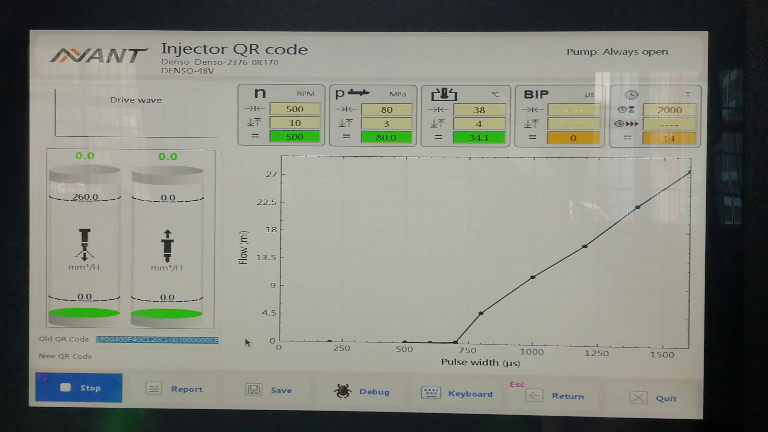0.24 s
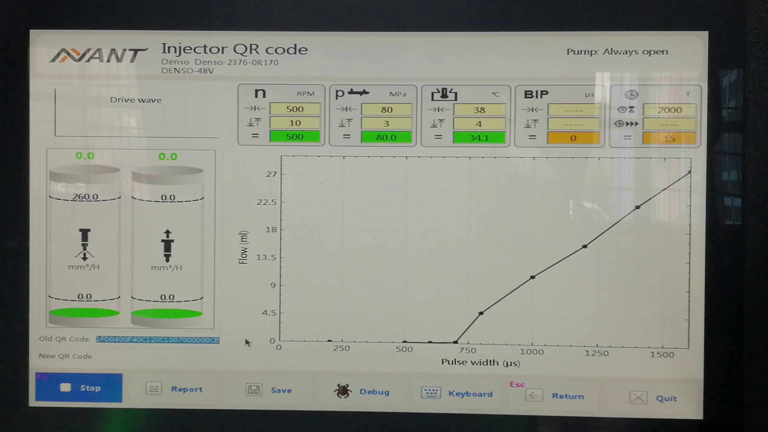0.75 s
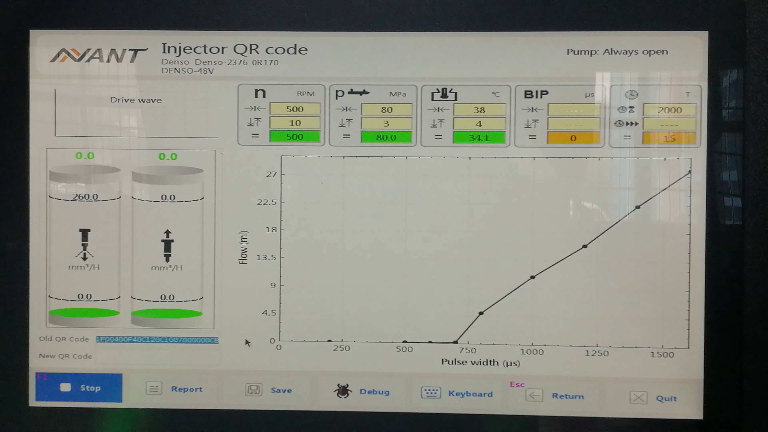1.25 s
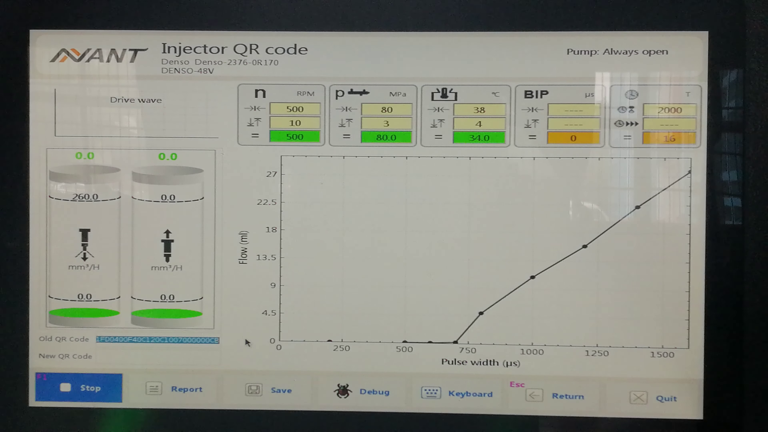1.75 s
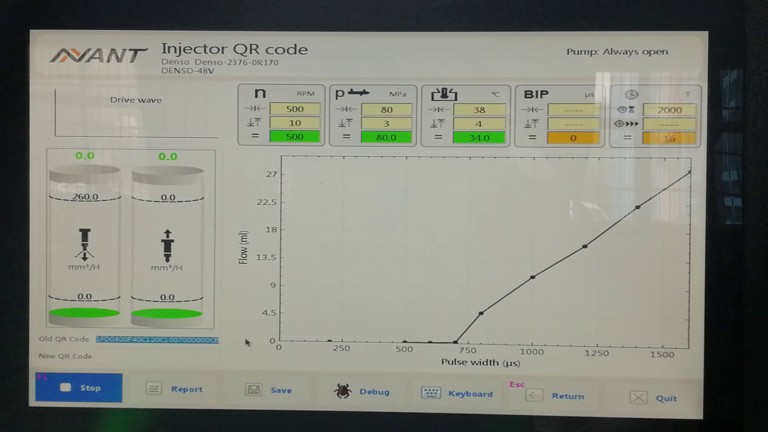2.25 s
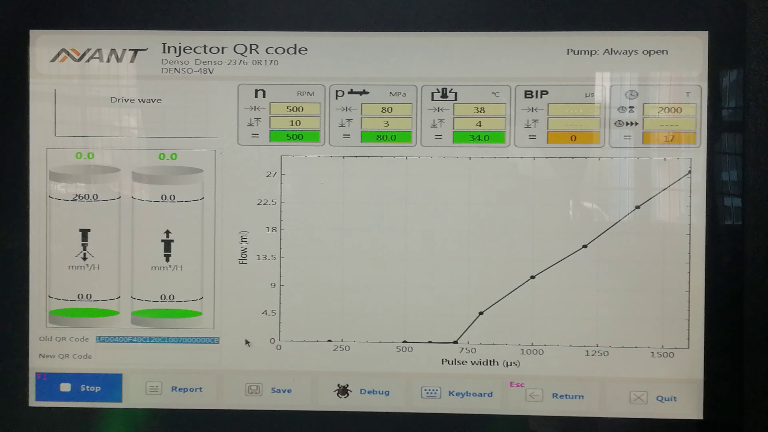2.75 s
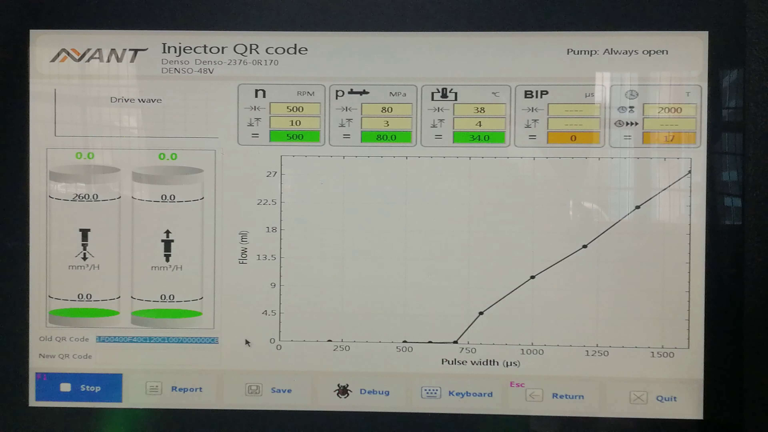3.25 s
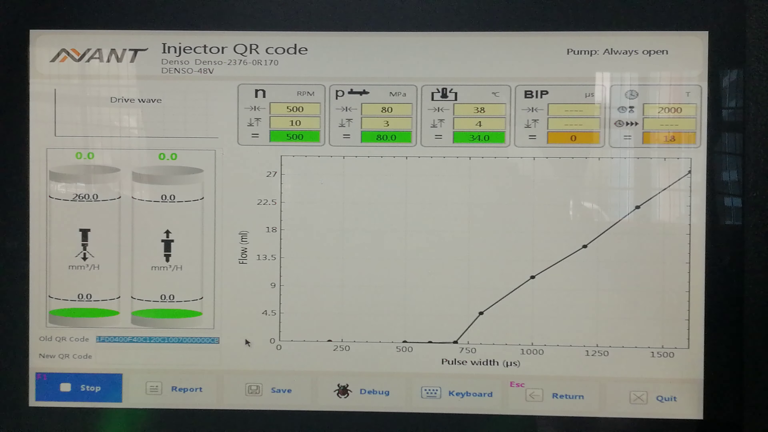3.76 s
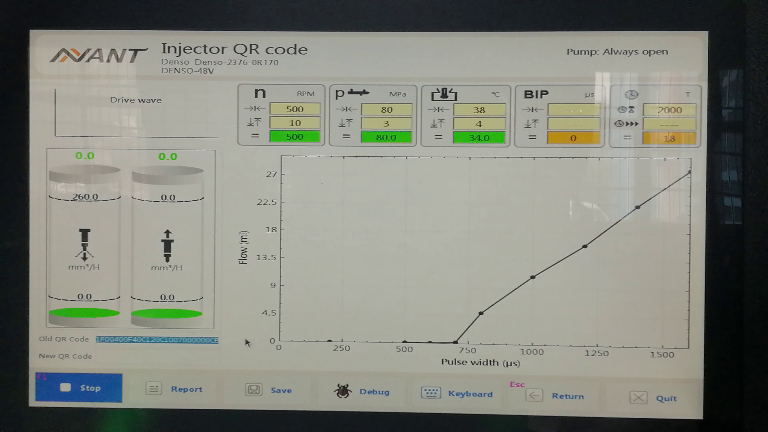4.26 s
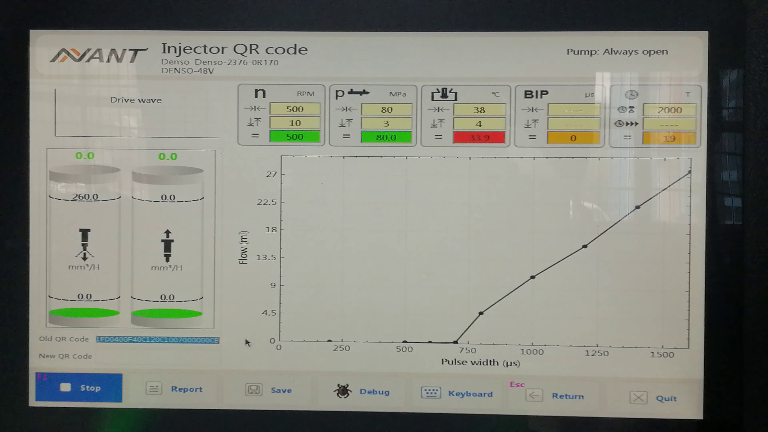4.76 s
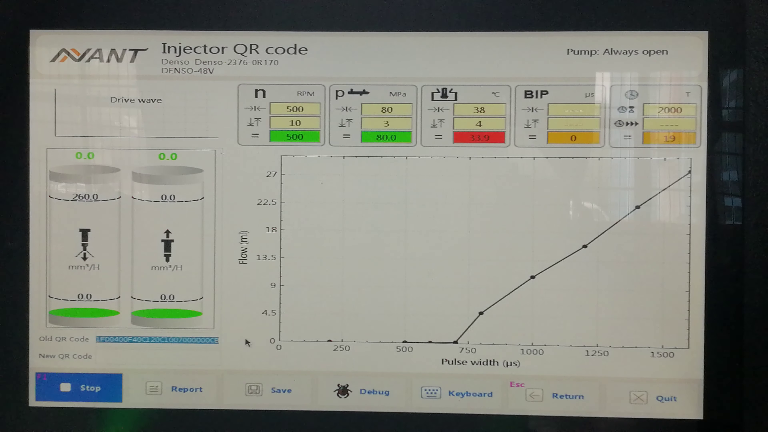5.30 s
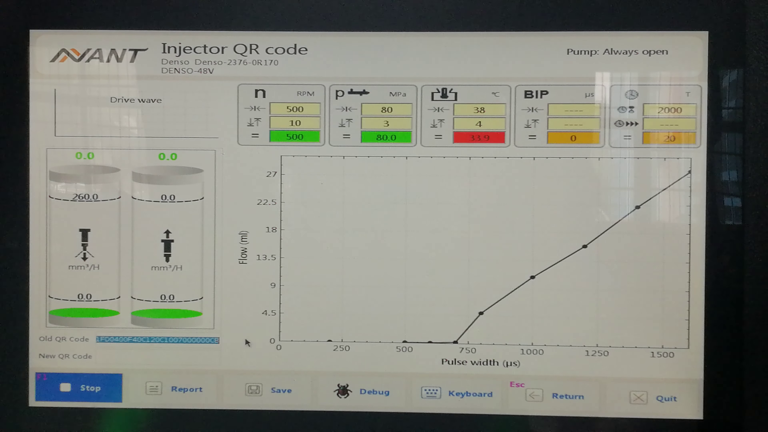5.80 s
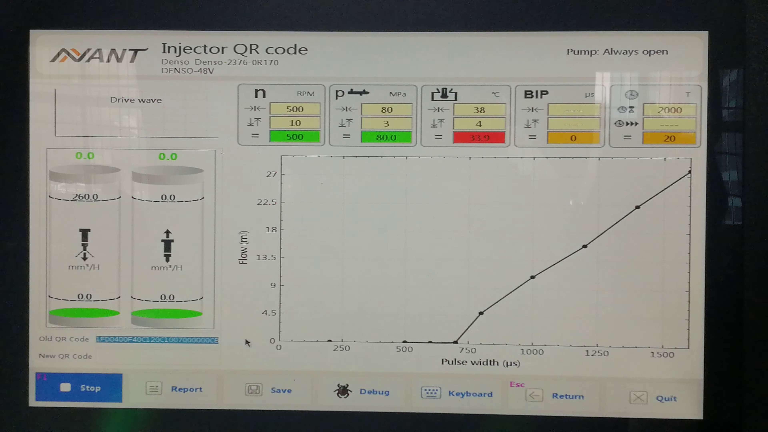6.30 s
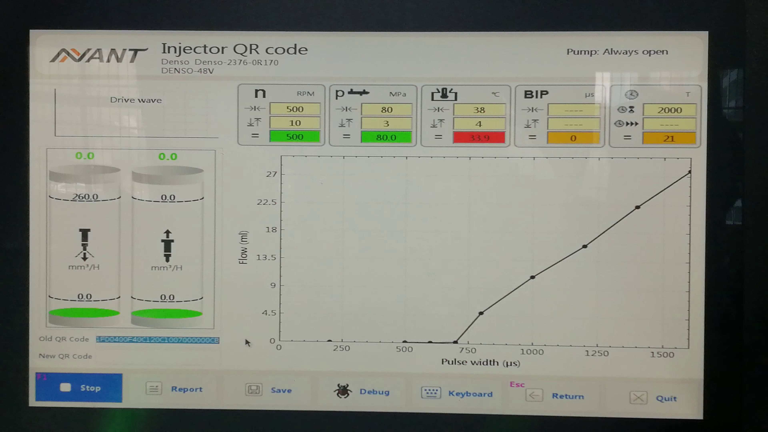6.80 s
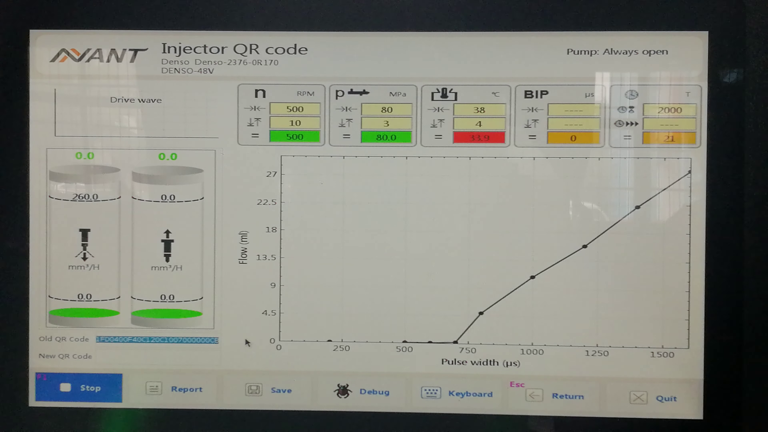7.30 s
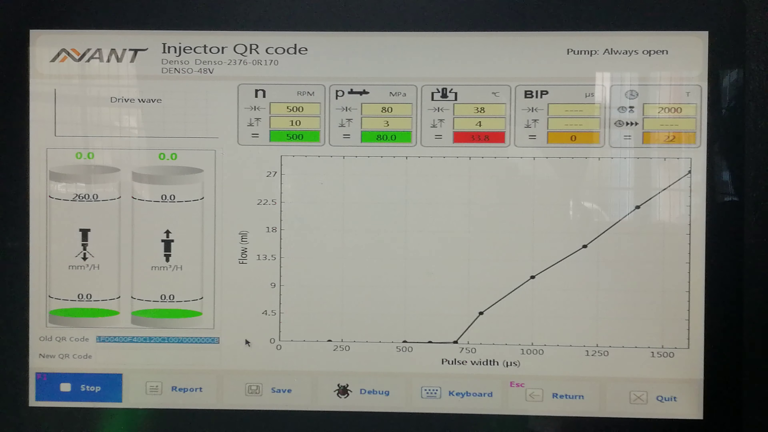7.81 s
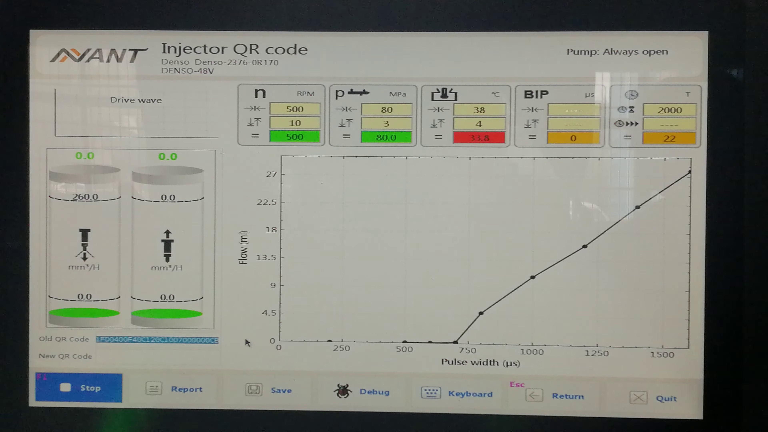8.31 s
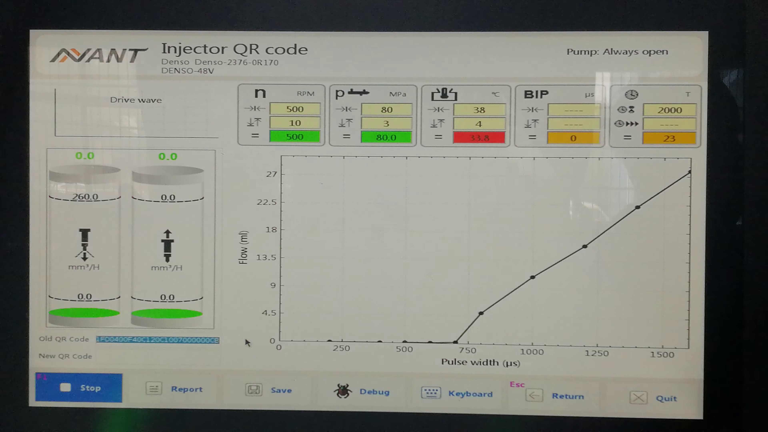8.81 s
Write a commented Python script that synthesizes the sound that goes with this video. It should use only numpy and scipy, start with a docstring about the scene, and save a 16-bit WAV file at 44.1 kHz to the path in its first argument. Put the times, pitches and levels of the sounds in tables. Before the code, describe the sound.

Continuous machine noise, already running and never stopping: rapid hard clicking from an injector, each click a tiny cluster of bright snaps with a brief metallic ring. Beneath lie the wavering hum and rattle of a drive motor and feed pump, steady treble hiss with narrow whistles, and low rumbling air. A short spurt of hiss comes about a third through, deep panel booms rise and fall, and the last ticks ring less. Close stereo pickup.

```python
"""Sharp ticks, 17 a second, over the hum of two shafts and a bright hiss: a diesel injector test bench. Each
tick is four noise bursts and ringing modes; near the end the pulses are short and the ticks lighter. Fuel
hisses and whistles through the pressure valve (shaped noise), under a thin high whine. The drive and feed
shafts hum (wavering sines) and rattle (noise repeated each turn). Behind them a low boom swells and sinks, a
fan motor hums and air rumbles."""
import sys
import numpy as np
from scipy import signal
from scipy.fft import rfft, irfft
from scipy.io import wavfile
from scipy.ndimage import uniform_filter1d

SR = 44100
rng = np.random.default_rng(int(sys.argv[2]) if len(sys.argv) > 2 else 0)


def wav_record(signal):
    """Record a signal, one row per channel, as 16-bit PCM in the file named by sys.argv[1]."""
    frames = np.transpose(np.atleast_2d(signal))
    bounded = np.clip(frames, -1, 1)
    # unit amplitude maps onto the largest positive 16-bit level
    quanta = np.round(bounded * 32767).astype(np.int16)
    wavfile.write(sys.argv[1], SR, quanta)


N = 399105
T = np.arange(N) / SR

DRIVE_HZ, FEED_HZ, SHOT_HZ = 13.137, 24.655, 17.0023
FIRST_SHOT_S, SHORT_PULSE_S = .0128, 8.69  # shots after SHORT_PULSE_S are short pulses
PORT_LAG_S = .00065  # left behind right, above the deep bass
TOP_HZ = 15700


def injector(crack_db=-8, snap_db=-6, ring_db=-36.0, scatter_db=1.04, jitter_s=.000012,
             short_crack_db=-1.5, short_ring_db=-15):
    """Each shot is four blows; on a short pulse the needle hardly lifts and the body rings less."""
    # armature lifts, needle stops, valve closes, needle seats:
    # (delay [s], relative crack level [dB], relative snap level [dB])
    blows = [(0, -1.5, -3.5), (.0013, -3, 0.5), (.0034, -3, -13), (.0046, -2, -18)]
    # crack of steel on steel: (frequency [Hz], relative level [dB], left minus right [dB])
    crack_colour = [(1500, -30, 13.5), (3060, -20.5, -6), (4320, -7, -9.5), (5470, -6, -1.5),
                    (6370, -2, -20.5), (7550, -1.5, -5), (8650, 0.5, 0.5), (9330, -6.5, -16),
                    (10560, -9.5, -10.5), (12000, -18, -16), (15600, -30.5, -35)]
    # bright snap of the solenoid: (frequency [Hz], relative level [dB], left minus right [dB])
    snap_colour = [(2030, -34, -2), (3860, -11.5, -7.5), (5030, -6.5, -8), (6440, -4, -14), (7500, -12, 4),
                   (8800, -5, -14), (11300, -18.5, -4), (14000, -21, -20), (14900, -17, -24),
                   (15800, -33, -32)]
    shots_s = np.arange(FIRST_SHOT_S, T[-1] - .01, 1 / SHOT_HZ)
    short = shots_s > SHORT_PULSE_S
    crack = impact(crack_colour, t60_s=.006, tail_db=-16, tail_t60_s=.06)
    snap = impact(snap_colour, t60_s=.003, tail_db=-24, tail_t60_s=.03)
    out = 0
    for blow, (delay_s, blow_crack_db, blow_snap_db) in enumerate(blows):
        late, strength = rng.standard_normal((len(shots_s), 2)).T
        times_s = shots_s + delay_s + jitter_s * late
        scattered_db = scatter_db * strength
        click = crack * undb(crack_db + blow_crack_db) + snap * undb(snap_db + blow_snap_db)
        out = out + strike(times_s, scattered_db + short * short_crack_db, click)
        out = out + strike(times_s, ring_db + scattered_db + short * short_ring_db, ring(blow))
    return out


def impact(table, t60_s, tail_db, tail_t60_s):
    """What one blow sends to each port: a short coloured burst and its echoes inside the cabinet."""
    t = np.arange(SR // 10) / SR
    hz = np.fft.rfftfreq(len(t), 1 / SR)
    early, late = rng.standard_normal((2, 2, len(t)))
    direct = early * np.exp(-np.log(1000) * t / t60_s)
    echoes = late * undb(tail_db) * np.exp(-np.log(1000) * t / tail_t60_s)
    burst = rfft(direct + echoes)
    # broad dips of the random burst are levelled, its fine ripple stays
    ripple = np.sqrt(uniform_filter1d(np.abs(burst) ** 2, size=70))
    target = undb(colour(table, hz)) * pan(colour(table, hz, axis=2))
    # folded cepstrum: a causal filter sets the colour and keeps the attack sharp
    cepstrum = irfft(np.log(target / ripple), len(t))
    cepstrum[:, 1:] *= 2 * (t[1:] < t[-1] / 2)
    return irfft(burst * np.exp(rfft(cepstrum)), len(t))


def ring(blow):
    """Decaying sines of the modes set off by one blow, a quarter cycle apart at the two ports."""
    # injector modes, the solenoid's struck on opening and the nozzle's on closing:
    # (blow number, frequency [Hz], relative level [dB], 60 dB decay [s], left minus right [dB])
    modes = [(0, 4410, -17, 0.016, -17), (0, 5193, -5, 0.053, -11.5), (0, 6440, -7, 0.016, 14),
             (1, 8390, -4, 0.011, 2), (2, 7085, 3, 0.022, -2), (2, 8310, -1.5, 0.029, -2),
             (3, 7107, 1, 0.046, 10.5), (3, 8650, -5.5, 0.015, -2)]
    t = np.arange(SR // 10) / SR
    port_phase = np.array([[0], [np.pi / 2]])
    out = 0
    for struck_by, hz, db, t60_s, side_db in modes:
        if round(struck_by) == blow:
            decay = np.exp(-np.log(1000) * t / t60_s)
            out = out + undb(db) * pan(side_db) * decay * np.sin(2 * np.pi * hz * t + port_phase)
    return out


def strike(times_s, db, response):
    """One response, repeated at the given times and levels."""
    at = times_s[:, None] * SR
    # sinc pulses place each blow between samples
    taps = at.astype(int) + np.arange(-8, 9)
    force = np.zeros((1, N + SR))
    force[0, taps] = np.sinc(taps - at) * undb(db)[:, None]
    return signal.fftconvolve(force, response, axes=1)[:, :N]


def valve(flicker_db=0.94):
    """Fuel hisses through the pressure valve, with brief spurts; narrow resonances whistle in the flow."""
    # steady hiss: (frequency [Hz], density [dB per Hz], left minus right [dB])
    hiss_colour = [(1000, -105, 1), (2760, -87.5, 0), (4640, -89, 0), (5800, -85, -1), (7640, -82, -2.5),
                   (9200, -79.5, -1.5), (10300, -84, -6.5), (11160, -87.5, -12), (12300, -94, -9),
                   (13240, -84, -11), (14100, -103, -15), (14900, -99, -20), (15800, -110, -22)]
    # whistles: (frequency [Hz], bandwidth [Hz], level [dB], left minus right [dB])
    whistles = [(1988, 56, -61.5, -2), (2840, 200, -56, -2), (6604, 51, -56, 2), (6710, 37, -56.5, 1),
                (10250, 80, -63, -14), (12800, 20, -70, -14), (13000, 20, -71, -8), (13354, 28, -69, -5),
                (13700, 20, -67, 0), (13801, 12, -74, -16)]
    # spurts of hiss: (time [s], half-width at half amplitude [s], relative level [dB])
    spurt_times = [(3.075, 0.049, 0.5), (7.6, .035, -8)]
    # spurt colour: (frequency [Hz], density of a 0 dB spurt [dB per Hz], left minus right [dB])
    spurt_colour = [(1200, -100, 0), (2700, -81.5, 7), (4930, -82.5, -3), (7000, -76.5, 0),
                    (9000, -74.5, -3), (10500, -87, -6), (12000, -97, -10), (15000, -108, -18)]
    hiss = rush(hiss_colour) * undb(flicker_db * walk(41))

    hz, noise = port_noise(N)
    gain = 0
    for centre_hz, width_hz, db, side_db in whistles:
        offset = (hz - centre_hz) / width_hz
        resonance = np.sqrt(SR / np.pi / width_hz) / (1 + 2j * offset)
        far_fade = np.exp(-(offset / 10) ** 2)
        gain = gain + undb(db) * pan(side_db) * resonance * far_fade
    whistling = irfft(noise * gain, N)

    spurts = sum(undb(db) / (1 + ((T - s) / width_s) ** 2) for s, width_s, db in spurt_times)
    return hiss + whistling + rush(spurt_colour) * spurts


def whine(db=-57, side_db=-16, wander=.0005):
    """A thin, even whine in the high treble: one sine of slightly wandering pitch."""
    hz = 13354
    cycles = np.cumsum(hz * (1 + wander * walk(25))) / SR
    return tone(hz, cycles, db) * pan(side_db)


def drive_shaft():
    """Hum and rattle of the drive motor and high-pressure pump."""
    # (multiple of the shaft rate, rounded in use, mean level [dB], left minus right [dB])
    orders = [(6, -58, 0), (8, -59.5, 0), (10, -54, -1.5), (12, -61.5, 8), (14, -56, 2), (16, -55, -13),
              (17, -44, 2), (18, -61.5, 3), (21, -44.4, 0), (22, -71, 4), (26, -65, 14), (30, -61, 1),
              (35, -62.5, 7.5), (36, -62, -8), (73.81, -57.5, -10.5)]
    return shaft(DRIVE_HZ, orders, wander=0.0005, flutter_1khz_db=0.7, clatter_db=-3)


def feed_shaft():
    """Hum and rattle of the feed pump, strongest at the rate of its 13 vanes."""
    # (multiple of the shaft rate, rounded in use, mean level [dB], left minus right [dB])
    orders = [(4, -64, -2), (12, -58.5, -5), (13, -42.5, -2), (25, -66.5, -10.5), (26, -56.5, -7.5),
              (27, -67, -16), (38, -62, -2.5), (39, -61.5, -11.5), (40, -62, -8), (50, -69, 12),
              (51, -66.5, -15.5), (52, -61, 10.5), (53, -60, -3.5), (55, -64.5, 5), (56, -72, -18),
              (65.5, -71.5, 11), (78.3, -64.5, -8)]
    return shaft(FEED_HZ, orders, wander=0.00088, flutter_1khz_db=2.0, clatter_db=-3.5)


def shaft(hz, orders, wander, flutter_1khz_db, clatter_db):
    """A loaded shaft: tones at multiples of its rate, and a rattle that comes round with every turn."""
    # rattle, before clatter_db: (frequency [Hz], relative density [dB])
    clatter_colour = [(30, -100), (90, -77), (300, -75.5), (480, -80.5), (700, -79), (1100, -81),
                      (1350, -82.5), (1600, -84), (2000, -88), (3500, -87), (6000, -98.5)]
    turns = np.cumsum(hz * (1 + wander * walk(2.88))) / SR
    hum = 0
    for multiple, db, side_db in orders:
        k = round(multiple)
        # high multiples waver more than the low hum
        flutter_db = flutter_1khz_db * np.sqrt(k * hz / 1000) * walk(15.7)
        hum = hum + tone(k * hz, k * turns, db + flutter_db) * pan(side_db)

    size = int(SR / hz)
    lines_hz, noise = port_noise(size)
    gain = undb(colour(clatter_colour, lines_hz) + clatter_db)
    one_turn = irfft(noise * gain, size) * np.sqrt(SR / 2)
    angle = np.arange(size) / size
    rattle = np.array([np.interp(turns % 1, angle, port) for port in one_turn])
    return hum + rattle


def boom_and_fan(rest_db=-61.5):
    """A low boom at twice the feed shaft rate swells and sinks over the hum of the fan motor."""
    # swells added to the resting boom: (time of crest [s], full length [s], level at crest [dB])
    swells = [(2.97, .36, -52), (4.85, 1.84, -45), (6.76, 2.0, -47), (8.7, 1.9, -50.5)]
    # cooling fan motor hum: (frequency [Hz], level [dB])
    fan_tones = [(99.6, -60), (149.4, -63)]
    boom_hz = 2 * FEED_HZ
    cycles = np.cumsum(boom_hz * (1 + 0.0039 * walk(1))) / SR
    loudness = undb(rest_db) + sum(undb(db) * swell(s, length_s) for s, length_s, db in swells)
    boom = loudness * tone(boom_hz, cycles, 0)
    fan = sum(tone(hz, hz * T, db) for hz, db in fan_tones)
    return boom + fan


def swell(crest_s, length_s):
    """A smooth rise and an equal fall, 1 at the crest."""
    return np.cos(np.pi * np.clip((T - crest_s) / length_s, -.5, .5)) ** 2


def workshop_air():
    """Cooling air and workshop rumble: broadband noise of slowly wavering level."""
    # (frequency [Hz], mean density [dB per Hz], left minus right [dB])
    air_colour = [(15, -90, 2), (30, -76.5, -3), (55, -73, -1), (85, -72.5, 2), (220, -73, -3.5),
                  (326, -73, 9.5), (367, -78.5, -4.5), (700, -77.5, -4.5), (1140, -86.5, -6.5),
                  (1320, -84.5, -1), (1600, -84, 0), (2330, -87.5, -4), (5000, -89.5, -2), (12000, -110, 3)]
    return rush(air_colour) * undb(.8 * walk(5))


def rush(table):
    """Steady stereo noise with a given density."""
    hz, noise = port_noise(N)
    gain = undb(colour(table, hz)) * pan(colour(table, hz, axis=2))
    return irfft(noise * gain, N) * np.sqrt(SR / 2)


def tone(hz, cycles, db):
    """A sine of given RMS level at both ports, from its running count of cycles; the left trails."""
    lag_cycles = np.array([[hz * port_lag(hz)], [0]])
    return np.sqrt(2) * undb(db) * np.sin(2 * np.pi * (cycles + rng.random() - lag_cycles))


def port_noise(size):
    """Spectra of white noise at two ports: alike in the bass, unrelated in the treble, later on the left."""
    hz = np.fft.rfftfreq(size, 1 / SR)
    mid, side = rfft(rng.standard_normal((2, size)))
    alike = 1 / (1 + (hz / 750) ** 2)
    signs = np.array([[1], [-1]])
    both = (mid * np.sqrt(1 + alike) + side * np.sqrt(1 - alike) * signs) / np.sqrt(2)
    both[0] *= np.exp(-2j * np.pi * hz * port_lag(hz))
    return hz, both


def port_lag(hz):
    """Seconds by which the left port trails; deep bass reaches both almost at once."""
    knee_hz = 100
    return PORT_LAG_S * hz ** 2 / (hz ** 2 + knee_hz ** 2)


def walk(rate_hz):
    """Smooth random drift of spread 1: noise under a Gaussian low-pass, without its mean."""
    hz = np.fft.rfftfreq(N, 1 / SR)
    y = irfft(rfft(rng.standard_normal(N)) * np.exp(-(hz / rate_hz) ** 2) * (hz > 0), N)
    return y / y.std()


def colour(table, hz, axis=1):
    """One column of a spectrum table, joined on a log-frequency axis."""
    rows = np.array(table, float)
    return np.interp(np.log(hz + 1e-9), np.log(rows[:, 0]), rows[:, axis])


def pan(db):
    """Left and right gains for a level difference."""
    return undb(np.array([[.5], [-.5]]) * db)


def undb(db):
    """Decibels to gain."""
    return 10 ** (np.asarray(db) / 20)


def scene():
    """The whole bench."""
    shafts = drive_shaft() + feed_shaft()
    return injector() + valve() + whine() + shafts + boom_and_fan() + workshop_air()


def record(dry):
    """A phone cuts the top: a steep elliptic low-pass."""
    low_pass = signal.ellip(10, .2, 80, TOP_HZ, fs=SR, output="sos")
    return signal.sosfilt(low_pass, dry)


dry = scene()
out = record(dry)
wav_record(out)
```